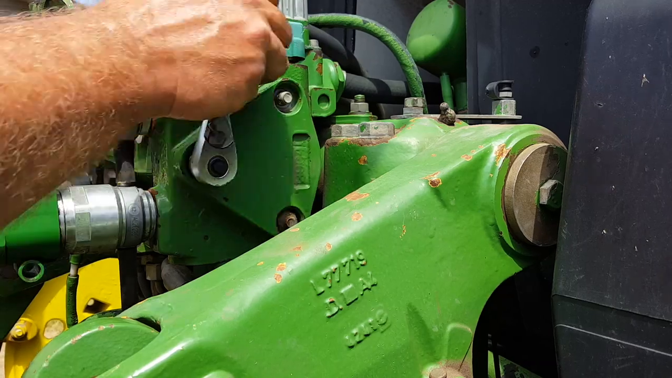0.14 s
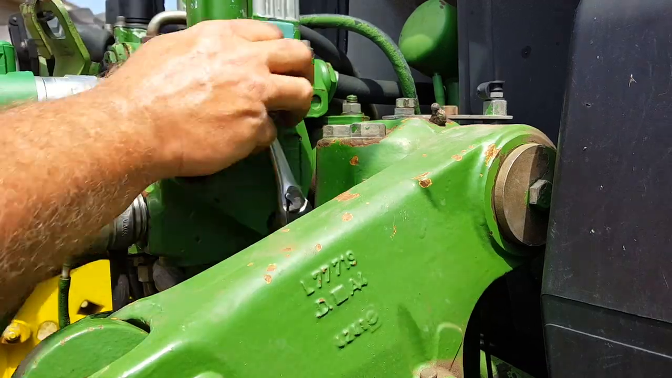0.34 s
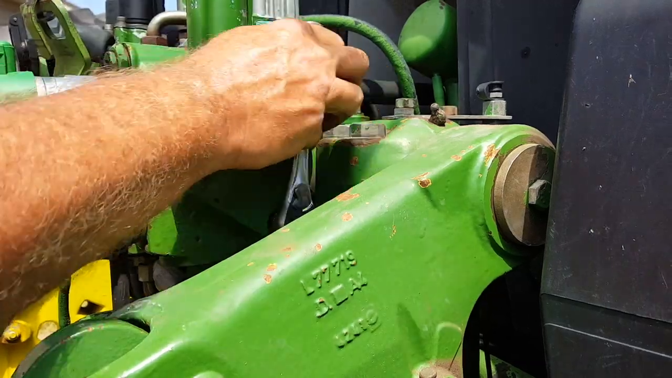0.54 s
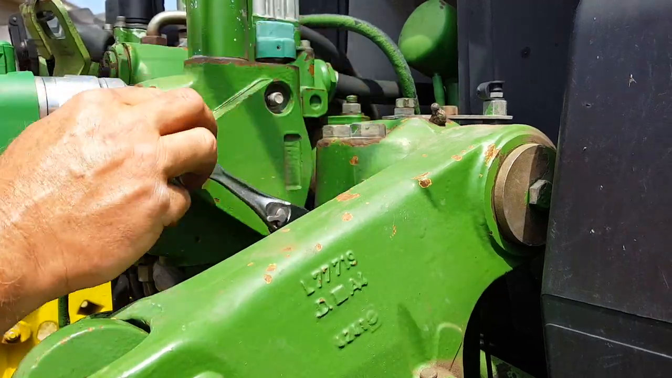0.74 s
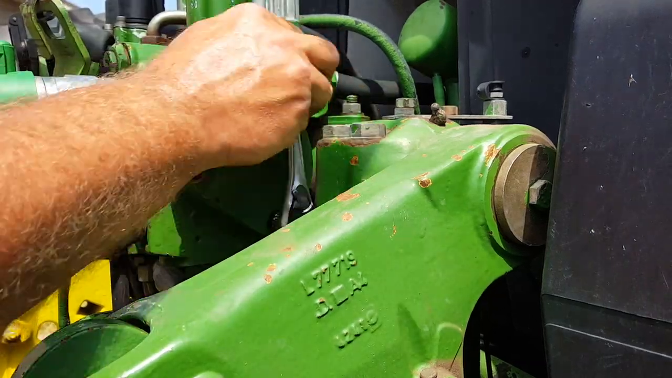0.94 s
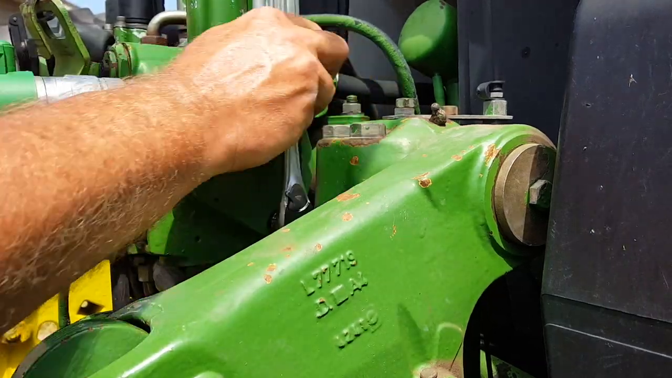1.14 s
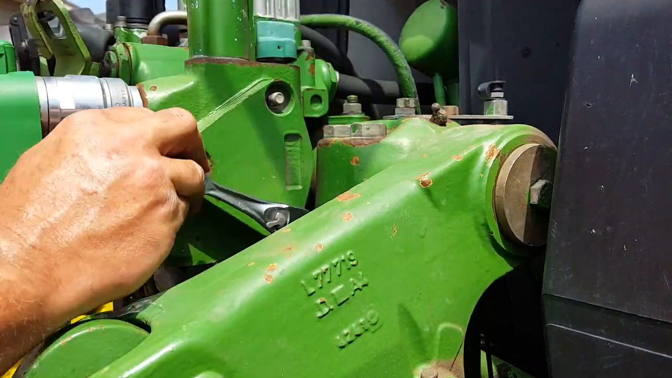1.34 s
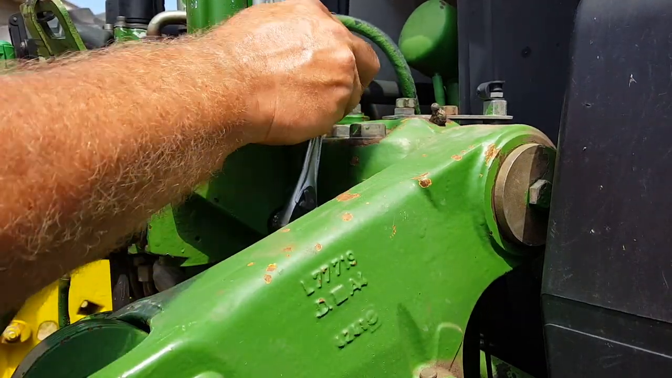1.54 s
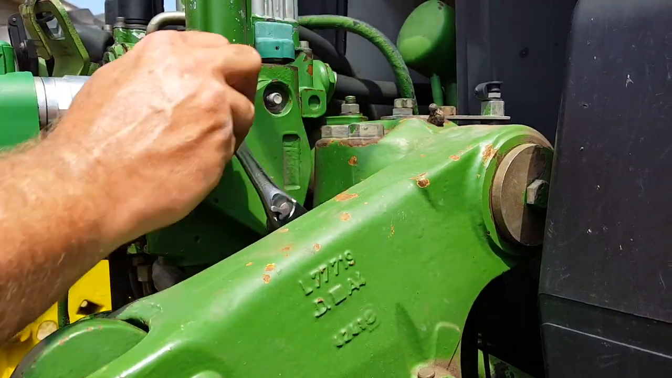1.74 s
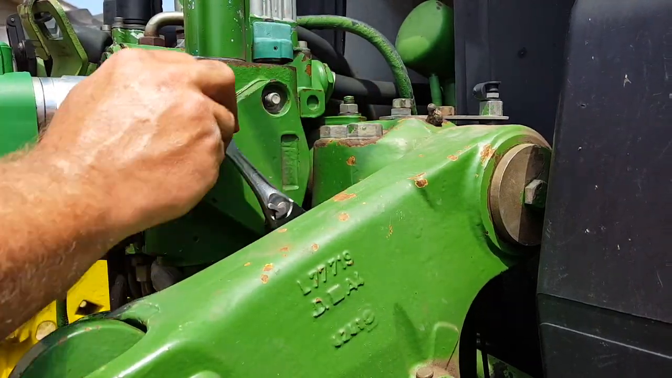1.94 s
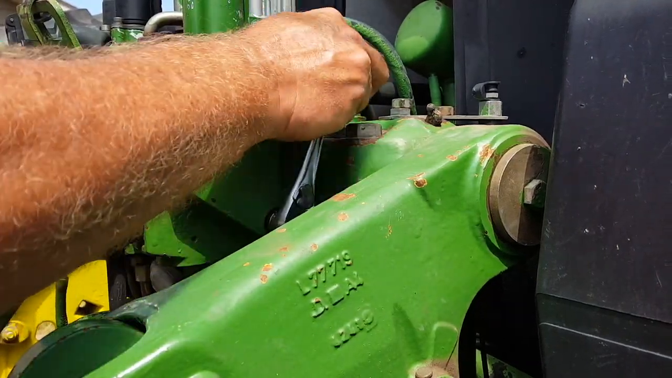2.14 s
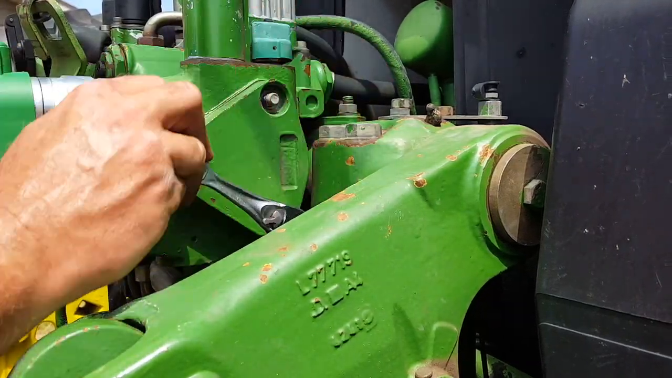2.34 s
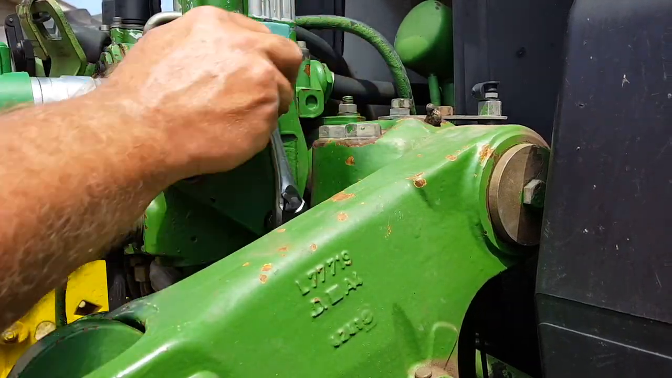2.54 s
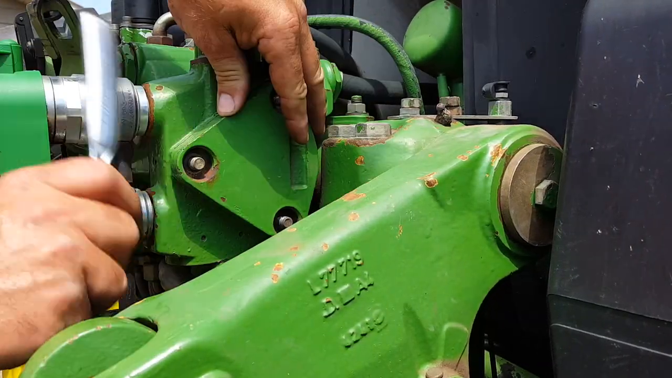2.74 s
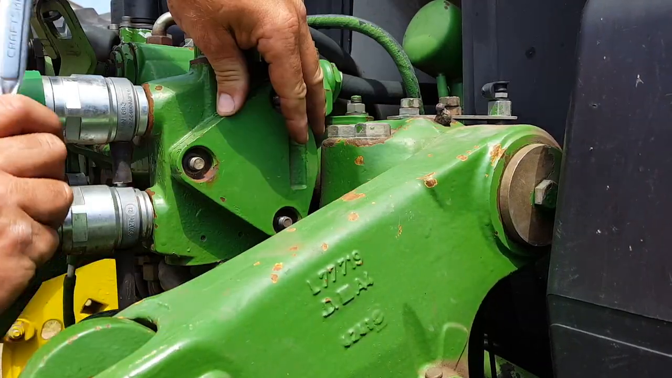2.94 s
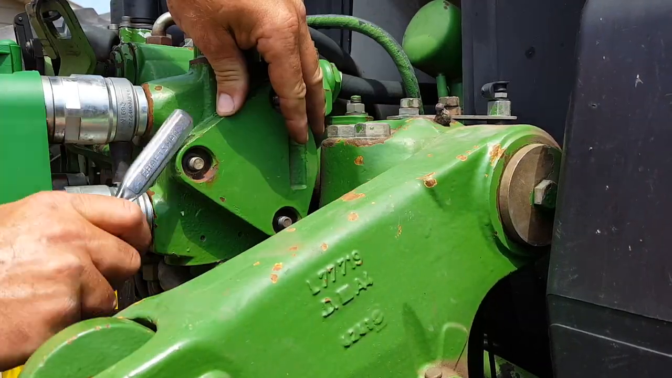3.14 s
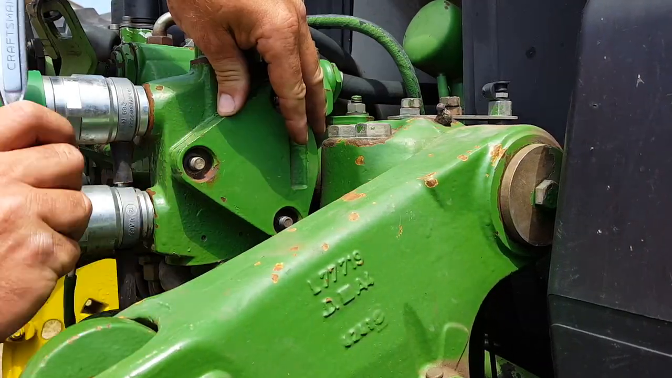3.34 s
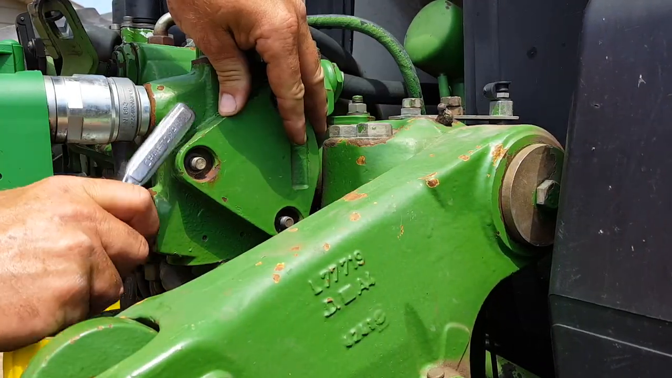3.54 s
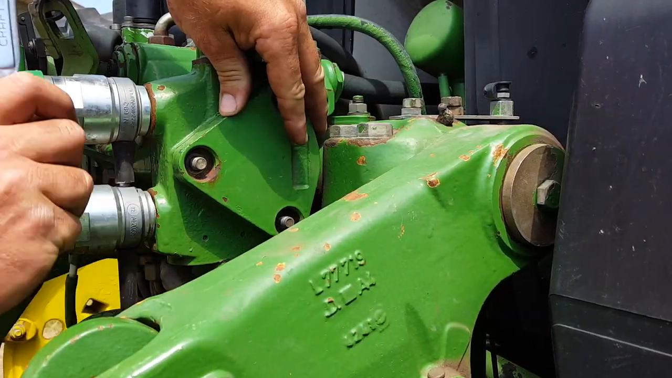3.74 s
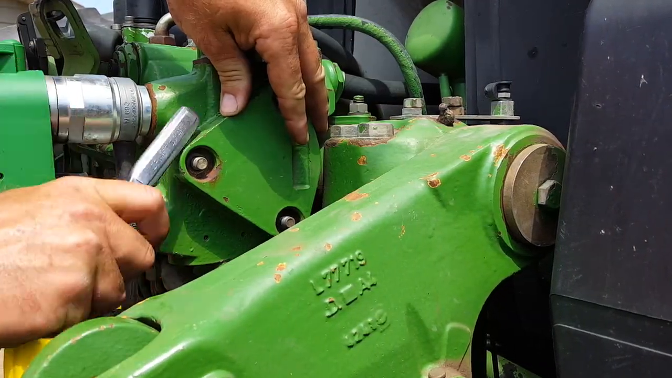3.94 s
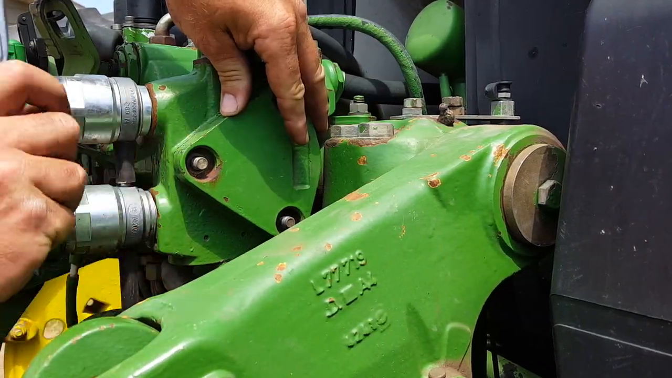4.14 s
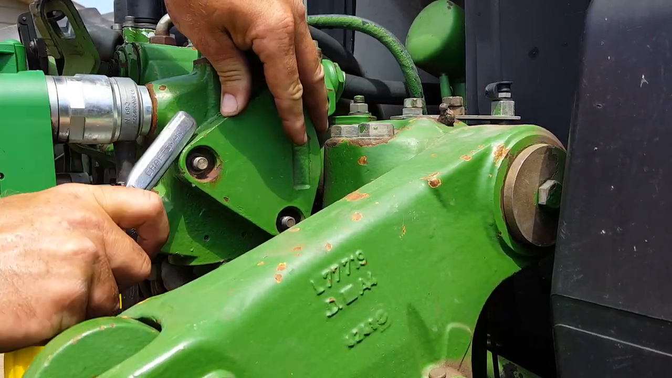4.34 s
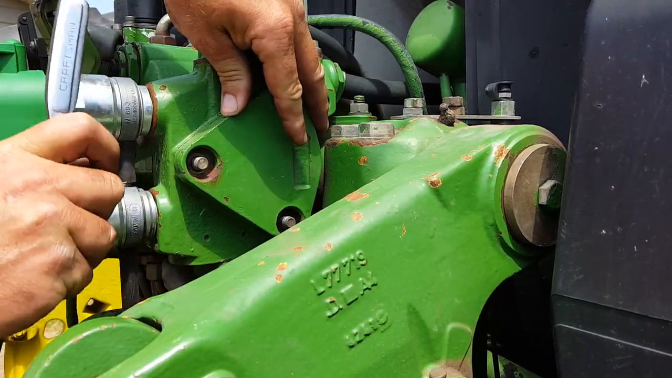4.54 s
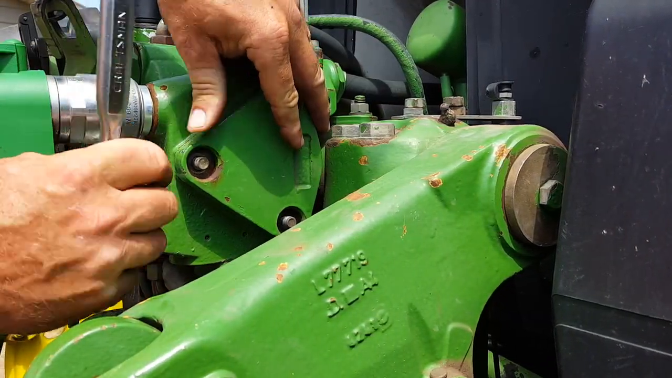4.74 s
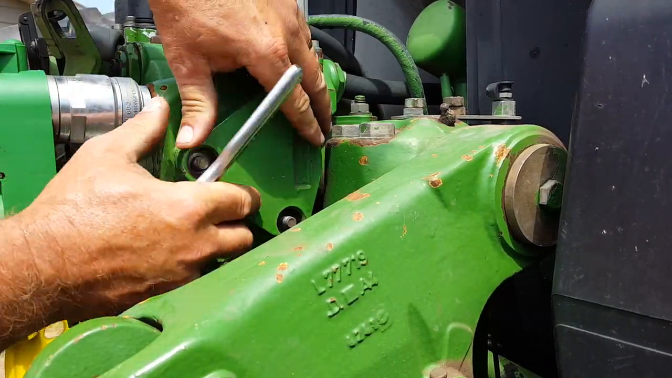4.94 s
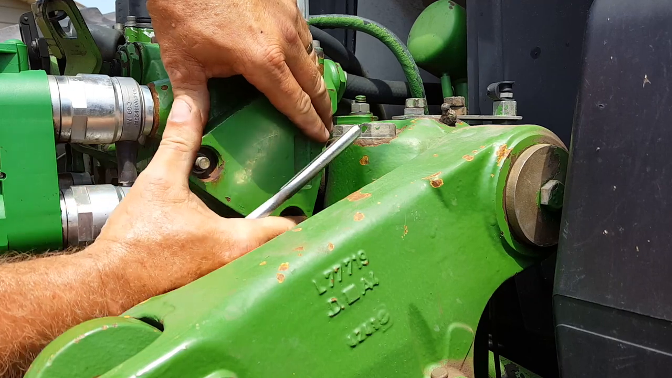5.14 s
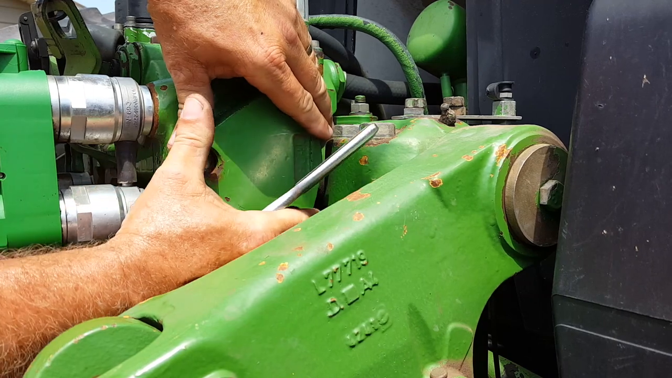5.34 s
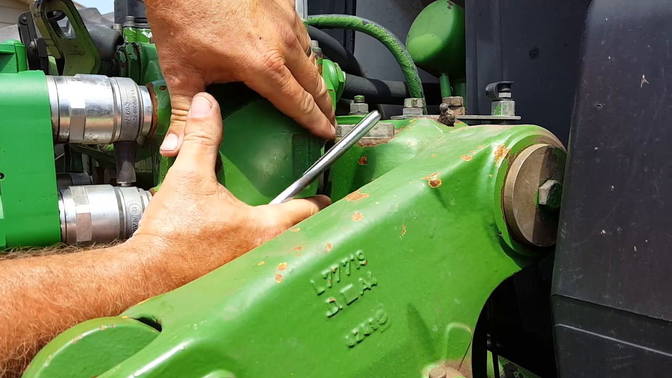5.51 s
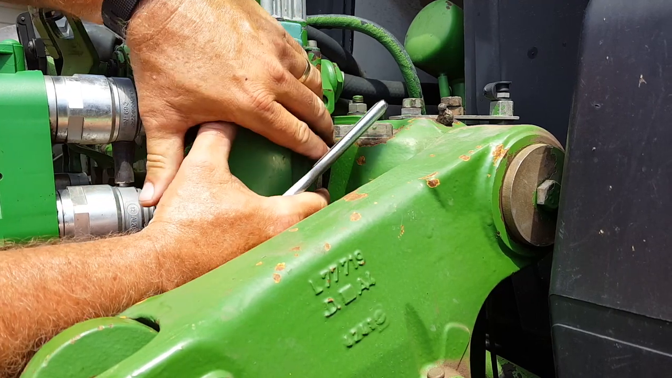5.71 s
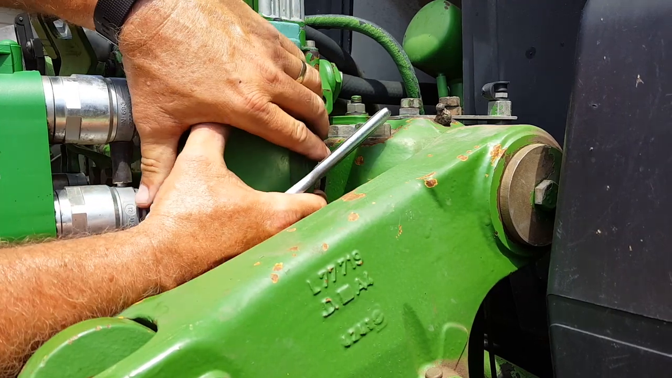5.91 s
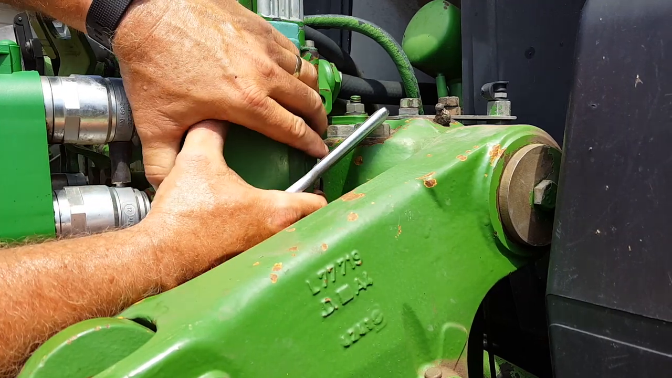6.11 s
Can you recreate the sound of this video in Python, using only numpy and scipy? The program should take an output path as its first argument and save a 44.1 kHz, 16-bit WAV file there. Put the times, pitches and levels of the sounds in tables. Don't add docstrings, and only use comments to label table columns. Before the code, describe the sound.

Crisp ratchet clicks and soft hand rubbing on a metal block, then five loud ringing wrench raps, ending in light handling knocks over faint outdoor hiss.

```python
import sys
import numpy as np
from scipy import signal
from scipy.io import wavfile

SR = 44100
rng = np.random.default_rng(int(sys.argv[2]) if len(sys.argv) > 2 else 0)


def elevation(decibels):
    levels = np.asarray(decibels, float)
    return 10 ** (levels / 20)


def store_wav(level_fs):
    pcm = np.round(np.clip(np.atleast_2d(level_fs), -1, 1) * 32767)
    wavfile.write(sys.argv[1], SR, pcm.T.astype(np.int16))


N = 276507
TIME_S = np.arange(N) / SR
SCENE_CHANGE_S = 2.79

# (start [s], end [s], drag at start [dB], drag at end [dB])
SWINGS = [
    (0.094, 0.302, -56, -87),
    (0.381, 0.523, -56, -60.5),
    (0.967, 1.094, -60.5, -66),
    (1.486, 1.68, -74, -79),
    (2.05, 2.26, -51, -76),
    (2.582, 2.751, -67, -72),
]
# (time [s], peak [dB], low colour [dB], high colour [dB], favoured mode [Hz])
RAPS = [(2.8389, -4.5, -11, -9, 8180), (2.8525, -23.5, -16.5, -7, 6500), (2.8589, -12.5, -13, -14.5, 1875),
        (3.1667, -6.5, -12.5, -6.5, 13100), (3.184, -13, -13.5, -9.5, 11250),
        (3.5473, -5.5, -13.5, -8.5, 6130), (3.5528, -18.5, -18, -8.5, 11250), (3.563, -11, -16, -10, 4070),
        (3.9608, -6.5, -16, -10, 6130), (3.9698, -14, -16.5, -9, 3770), (3.9778, -13.5, -16.5, -9, 11250),
        (4.3588, -4.5, -11, -7.5, 8180), (4.3737, -11.5, -23, -6, 13100), (4.3865, -26.5, -26, -11, 6130)]
# (before scene change [dB], added by a swing [dB], after scene change [dB], share of gain dip
TOP_LEVEL = (-82, 2, -76.0, 1)


def rms_one(x):
    return x / np.sqrt(np.mean(x ** 2) + 1e-20)


def in_time(rows):
    s, *columns = np.transpose(rows)
    return [np.interp(TIME_S, s, column) for column in columns]


def at_hz(points, hz):
    table_hz, value = np.transpose(points)
    return np.interp(np.log(hz), np.log(table_hz), value)


def add_at(out, s, piece):
    start = round(s * SR)
    out[..., start:start + piece.shape[-1]] += piece


def drift(rate):
    r = np.exp(-80 * np.pi * rate / SR)
    slow = signal.lfilter([1], [1, -2 * r, r * r], rng.standard_normal(N // 40 + 2002))[2000:]
    return np.interp(np.arange(N) / 40, np.arange(len(slow)), rms_one(slow))


def band_noise(low_hz, high_hz, order=2):
    sos = signal.butter(order, [low_hz, high_hz], "band", fs=SR, output="sos")
    return signal.sosfilt(sos, rng.standard_normal((2, N)))


def bands(spectrum, size=N):
    # (frequency [Hz], left-right likeness [-1 to 1])
    likeness = [(60, 1), (300, 0.64), (700, 0.14), (1500, -.1), (15000, -0.22)]
    white = rng.standard_normal((2, 2, size))
    edges = 20 * 2 ** np.arange(0, 10.1, .5)
    edges = edges[(edges > spectrum[0][0] / 1.3) & (edges < spectrum[-1][0] * 1.3)]
    for k, (low, high) in enumerate(zip(edges, edges[1:])):
        mid, side = signal.sosfilt(signal.butter(2, [low, high], "band", fs=SR, output="sos"), white[k % 2])
        hz = np.sqrt(low * high)
        alike = np.clip(at_hz(likeness, hz), -1, 1)
        stereo = np.sqrt(1 + alike) * mid + np.sqrt(1 - alike) * side * [[1], [-1]]
        yield hz, elevation(at_hz(spectrum, hz)) * stereo


def steady(spectrum, patchy_db):
    together = drift(14.0)
    return rms_one(sum(band * elevation(patchy_db * (0.37 * together + drift(5.9))) for hz, band in bands(spectrum)))


def arm():
    ramp_s = 0.13
    moves = [np.interp(TIME_S, [a - ramp_s, (a + b) / 2, b, b + ramp_s], [0, 0.8, 0.58, 0]) for a, b, *_ in SWINGS]
    return np.max(moves, axis=0)


def level(row):
    # (time [s], gain [dB])
    gain = [
        (2.79, -7),
        (3.5, -9.5),
        (4.63, -12),
        (4.98, -10.5),
        (5.04, -7),
        (5.36, 0),
        (6.27, 0),
    ]
    before_db, swing_db, after_db, share = row
    return np.where(TIME_S < SCENE_CHANGE_S, before_db + swing_db * arm(), after_db + share * in_time(gain)[0])


def rumble():
    # (frequency [Hz], density [dB per Hz])
    spectrum = [(12, -40), (20, -12.5), (27, -12), (43, -8.5), (91, 3), (145, -6), (216, -8), (258, -11),
                (300, -15), (462, -29.5), (700, -19.5), (910, -45), (1540, -120)]
    # (before scene change [dB], added by a swing [dB], after scene change [dB], share of gain dip [ratio])
    floor = (-60.5, 1, -62, 1.05)
    # (time [s], peak [dB], rise [dB per s])
    bumps = [(0.42, -53.5, 112), (0.65, -60, 150), (1.0, -57, 27), (1.201, -51.5, 301), (1.57, -53.5, 240),
             (1.745, -52, 99), (2.07, -56.5, 57), (2.33, -53, 19), (2.58, -55.5, 41), (2.68, -58.5, 52),
             (5.252, -59.5, 104), (5.456, -57.5, 37), (5.746, -58, 29.5), (6.02, -59.5, 24),
             (6.26, -54, 155)]
    bump_fall_db_per_s, boom_db, boom_fall_db_per_s = 120, -55.5, 66
    layers_db = [level(floor)]
    for s, peak_db, rise in bumps:
        layers_db.append(peak_db - np.maximum(rise * (s - TIME_S), bump_fall_db_per_s * (TIME_S - s)))
    for s, peak_db, *_ in RAPS:
        if peak_db > -9.5:
            layers_db.append(np.where(TIME_S > s, boom_db - boom_fall_db_per_s * (TIME_S - s), -130))
    return elevation(np.max(layers_db, axis=0) + 0.78) * steady(spectrum, patchy_db=1.27)


def leaf_hiss():
    # (frequency [Hz], density [dB per Hz])
    spectrum = [(180, -27.5), (300, 0), (443, -8.5), (520, -9), (1260, -12.5), (2950, -14.5), (5560, -21),
                (8460, -20), (9500, -21), (12400, -52), (20900, -120)]
    # (before scene change [dB], added by a swing [dB], after scene change [dB], share of gain dip [ratio])
    row = (-74.0, 7, -74, 0.9)
    return elevation(level(row) + 5.5) * steady(spectrum, patchy_db=0.55)


def top_hiss():
    edges = [12000, 15700]
    return elevation(level(TOP_LEVEL) + 1.5) * rms_one(band_noise(*edges))


def wind():
    # (time [s], level [dB])
    gust = [(0.0, -45.5), (0.02, -49), (0.062, -52), (0.106, -46), (0.154, -54.5), (0.18, -48.5),
            (0.27, -50), (0.29, -89), (0.36, -72)]
    gust_db, = in_time(gust + [(gust[-1][0] + .03, -120)])
    return elevation(gust_db + [[.5], [4.5]]) * rms_one(band_noise(35, 135, order=3))


def cricket():
    # (before scene change [dB], added by a swing [dB], after scene change [dB], share of gain dip [ratio])
    row = (-89, -8, -80, 1.1)
    hz, width_hz, throbs_per_s = 8620, 420, 17.0
    tone = band_noise(hz - width_hz / 2, hz + width_hz / 2)
    phase = 2 * np.pi * throbs_per_s * TIME_S - .5 + .4 * drift(1.5)
    throb = np.maximum(np.sin(phase) + .5, .3) * (1 - .4 * np.sin(3 * phase)) * elevation(2.5 * drift(3.0))
    return elevation(level(row)) * rms_one(tone * throb)


def rub():
    # (frequency [Hz], density [dB per Hz])
    colour = [(410, -45), (700, 1), (788, 1), (1170, -12.5), (3210, -12.5), (4170, -3), (4580, 3),
              (9800, -22), (12000, -17.5), (15600, -37.5), (22000, -120)]
    rub_db, swing_db, start_db_per_s, full_s = -73.5, 7, 54, 0.41
    working_db = rub_db + swing_db * arm() - start_db_per_s * np.maximum(full_s - TIME_S, 0)
    return elevation(np.where(TIME_S < SCENE_CHANGE_S, working_db, -130) + 4.5) * steady(colour, patchy_db=1.0)


def ring(clicks, hz, t60):
    r, w = elevation(-60 / (t60 * SR)), 2 * np.pi * hz / SR
    return signal.lfilter([0, np.sin(w)], [1, -2 * r * np.cos(w), r * r], clicks + 1e-18)


def dying(clicks, t60):
    return signal.lfilter([1], [1, -elevation(-60 / (t60 * SR))], clicks + 1e-18)


def strike(events, pan_db, bass_left_db, favour_db, modes, crack, crack_t60, modes_db, crack_db, scatter_db,
           ring_s, chatter_db, tail_t60, tail_db, tail):
    rattle_db, rattle_per_s = 3.0, 220
    s, peak_db, low_db, high_db, favoured_hz = np.transpose(events)
    first = round(s.min() * SR)
    at = np.round(s * SR).astype(int) - first
    size = at.max() + SR // 3
    favoured = np.argmin(abs(favoured_hz[:, None] - np.array(modes)[:, 0]), axis=1)

    def train(hz, gain):
        low = np.clip(np.log2(3500 / hz), 0, 1)
        high = np.clip(2 * np.log2(hz / 7500), 0, 1)
        side = elevation(np.outer([.5, -.5], pan_db + bass_left_db * low + np.zeros(len(s))))
        clicks = np.zeros((2, size))
        clicks[:, at] = side * elevation(peak_db + low * low_db + high * high_db) * gain
        return clicks

    out, grit = np.zeros((2, size)), rng.standard_normal((2, size))
    for k, (hz, level_db, t60) in enumerate(modes):
        luck = np.clip(rng.standard_normal((len(at), 4)).T, -2, 1.5)
        mode_db = level_db + modes_db + favour_db * (favoured == k) + scatter_db * luck[:2]
        clicks = train(hz, elevation(mode_db) * np.sign(luck[2:]))
        chatter = elevation(chatter_db) * grit * dying(clicks, min(t60, tail_t60))
        out += ring(clicks + chatter, hz, np.clip(ring_s, .008, .04))
    for hz, band in bands(crack, size=size):
        clicks = train(hz, elevation(crack_db))
        rattle = elevation(tail_db + at_hz(tail, hz) + rattle_db * drift(rattle_per_s)[:size])
        out += band * (dying(clicks, at_hz(crack_t60, hz)) + rattle * dying(clicks, tail_t60 * (hz / 3000) ** -.2))
    return np.pad(out, [(0, 0), (first, N - first - size)])


def ratchet():
    # (time [s], peak [dB], low colour [dB], high colour [dB], favoured mode [Hz])
    pawl = [(0.1231, -32.5, -13, -1, 12750), (0.1404, -28, -22, -1, 8170), (0.1545, -32, -39, -1.5, 11290),
            (0.187, -29.5, -44, -3, 11290), (0.2613, -26.5, -13.5, 1, 1818), (0.299, -34, -15, -2.5, 4095),
            (0.398, -22.5, -22.5, -6, 4095), (0.4222, -26, -30, -10, 12750), (0.4454, -30, -21, -4, 12750),
            (0.4646, -32.5, -18, -3, 12750), (0.4835, -24, -19, 1.5, 6120), (0.5118, -23, -23, -1, 6120),
            (0.9645, -33, -38, -1, 8170), (0.9868, -33, -28, -7, 12750), (1.0116, -28.5, -23, -1, 11290),
            (1.0329, -27, -12, -0.5, 3110), (1.059, -27, -17, -2, 6120), (1.092, -25, -18.5, -0.5, 4095),
            (1.5228, -34.5, -17, -9, 12750), (1.5612, -33.5, -16, -2, 11290),
            (1.5845, -29.5, -14.5, -4, 3110), (1.6134, -28, -19, -1, 11290),
            (1.6604, -24, -22.5, -0.5, 3110), (2.0783, -30.5, -16, -7, 11290),
            (2.0967, -25.5, -19, -3.5, 11290), (2.1171, -24, -19, -9, 4870),
            (2.141, -28.5, -15.5, -6.5, 11290), (2.6424, -24.5, -24, 2.5, 10660),
            (2.6542, -27, -15, 0, 6120), (2.678, -26, -16, -7.5, 3110), (1.0155, -31, -19, -2.5, 11290),
            (2.2658, -44.5, -17, -6, 6120)]
    # (time [s], peak [dB])
    slips = [(0.0494, -34), (0.104, -34), (0.2674, -28.5), (0.3713, -28), (0.4286, -32), (1.024, -32),
             (1.1773, -41), (1.504, -35.5), (1.5422, -37.5), (1.738, -38), (2.0401, -36.5), (2.0583, -34),
             (2.177, -33.5), (2.2413, -45), (2.5815, -41), (2.601, -33), (2.616, -42), (2.635, -33),
             (2.711, -36)]
    # (time [s], peak [dB], low colour [dB], favoured mode [Hz])
    seats = [(0.1998, -37.5, -12, 4870), (0.253, -48, -13, 1818), (0.5977, -41, -16, 4095),
             (0.636, -40.5, -37, 4095), (0.881, -43, -17, 4095), (0.903, -43.5, -7.5, 4095),
             (1.1883, -39, -11, 6120), (1.2054, -34, -13, 4095), (1.414, -32, -25, 8170),
             (1.703, -40, -14, 6120), (1.9506, -33.5, -19, 8170), (1.9786, -45.5, -4.5, 4095),
             (2.1685, -37, -11, 6120), (2.1831, -33.5, -14, 1818), (2.1942, -36, -11, 950),
             (2.2126, -37, -8, 4095), (2.2569, -38.5, -22, 4870), (2.292, -46.5, -33, 4870),
             (2.352, -49, -26, 4095), (2.4998, -26.5, -26.5, 8170), (2.5203, -45, -8, 1818),
             (2.7246, -41.5, -18, 1818), (2.785, -45, -13, 6120)]
    # (frequency [Hz], level [dB], decay t60 [s])
    wrench = [(950, 8.5, .05), (1818, 11.5, .05), (3110, 0, 0.03), (4095, -1.5, .07), (4870, -10, .05),
              (6120, -0.5, .08), (8170, -5.5, .06), (8180, 0.5, 0.015), (10660, 9, 0.0052),
              (11290, 6, 0.036), (12750, 6, .015), (16100, -1, 0.013)]
    # (frequency [Hz], density [dB per Hz])
    crack = [(290, 2.5), (500, -3), (950, 7.5), (1440, -14), (1900, 13.5), (2500, -13.5), (4030, -11),
             (7310, -10.5), (11100, -4), (16000, -3.5)]
    # (frequency [Hz], decay t60 [s])
    crack_t60 = [(500, 0.014), (3000, 0.061), (15000, 0.005)]
    # (frequency [Hz], level [dB])
    tail = [(300, -2), (2000, -1), (15000, -4)]
    contacts = pawl + [(s, db, -19.5, -2.5, 12750) for s, db in slips]
    contacts = contacts + [(s, db, low_db, -8, hz) for s, db, low_db, hz in seats]
    pan_db = 0.9 + 2.5 * rng.standard_normal(len(contacts))
    return strike(contacts, pan_db, 0.41, 7.6, wrench, crack, crack_t60, modes_db=-22.0, crack_db=-0.5,
                  scatter_db=1.5, ring_s=0.014, chatter_db=-15.0, tail_t60=0.058, tail_db=-32.0, tail=tail)


def rings():
    # (time [s], peak [dB], frequency [Hz], decay t60 [s])
    contact_rings = [(0.103, -56, 1460, 0.057), (0.2, -58, 1320, 0.035), (0.263, -47, 2204, .04),
                     (0.292, -56, 4180, .06), (0.373, -58, 2920, .05), (0.399, -52, 1210, 0.058),
                     (0.484, -42, 1885, 0.07), (0.49, -62, 1003, .04), (0.513, -41, 1860, 0.039),
                     (0.987, -44, 13000, .03), (1.033, -49.5, 890, .04), (1.059, -48, 1852, 0.031),
                     (1.06, -48, 4040, 0.07), (1.092, -42.5, 3050, 0.036), (1.206, -49.5, 3090, .04),
                     (1.157, -62, 4100, .07), (1.523, -48, 13000, 0.032), (1.543, -50, 11100, .03),
                     (1.585, -38, 11300, 0.058), (1.585, -56, 1010, .04), (1.614, -58, 1000, .05),
                     (1.614, -50, 1875, 0.08), (1.661, -46.5, 1760, 0.032), (2.042, -58, 747, 0.039),
                     (2.097, -56, 950, .04), (2.118, -49.5, 1900, 0.069), (2.118, -42, 4650, .04),
                     (2.118, -61, 806, 0.035), (2.141, -55.5, 1610, .03), (2.184, -54, 1764, .06),
                     (2.5, -55, 800, 0.029), (2.521, -60, 2101, .04), (2.642, -55.5, 1914, 0.13),
                     (2.654, -47.5, 853, .04), (2.654, -50.5, 1920, 0.06), (2.679, -48.5, 1003, 0.056),
                     (2.712, -60, 1050, 0.036), (2.728, -61, 1800, 0.032), (0.051, -44, 9650, .02),
                     (0.262, -49, 11200, 0.046), (1.727, -50, 700, .03), (5.7413, -43, 830, .012),
                     (5.007, -66, 8100, .04), (5.224, -64, 8030, .04)]
    # (time [s], peak [dB], frequency [Hz], decay t60 [s])
    rap_rings = [(2.8395, -21.5, 2550, .025), (2.8392, -19, 6240, 0.022), (2.8395, -21, 8280, .04),
                 (2.839, -25, 700, .018), (2.86, -30, 1875, .065), (2.878, -44.5, 6130, 0.098),
                 (3.167, -19, 6300, .022), (3.184, -35, 1875, .07), (3.185, -23, 11250, 0.039),
                 (3.5475, -22, 1010, .018), (3.563, -28, 4070, .05), (3.9616, -21.5, 1500, 0.019),
                 (3.9609, -18, 6470, .022), (3.965, -25.5, 3910, .05), (4.359, -19, 740, .018),
                 (4.359, -19, 1502, 0.017), (4.359, -21, 1940, 0.022), (4.3592, -21, 6130, .1),
                 (4.385, -38, 8180, .07)]
    twin_split, twin_db, lag_ms, flutter_db, flutter_per_s = 0.045, -5.5, 0.098, 3.0, 60.
    rows = contact_rings + rap_rings
    out, t = np.zeros((2, N)), np.arange(6000) / SR
    for (s, peak_db, hz, t60), (split, lag) in zip(rows, rng.uniform(-1, 1, (len(rows), 2))):
        late = t - np.array([[0], [lag * lag_ms / 1000]])
        twin = elevation(twin_db) * np.sin(2 * np.pi * hz * (1 + twin_split * split) * late)
        add_at(out, s, elevation(peak_db - 60 * t / t60) * (np.sin(2 * np.pi * hz * late) + twin))
    return out * elevation(flutter_db * drift(flutter_per_s))


def drag():
    grains = rng.standard_normal((2, N)) * (rng.random(N) < 2500. / SR)
    grains = grains * elevation(3.5 * np.minimum(rng.exponential(1, N), 3))
    bright = signal.sosfilt(signal.butter(2, [1500., 14000.], "band", fs=SR, output="sos"), grains)
    rows = []
    for a, b, a_db, b_db in SWINGS:
        rows += [(a - .004, -130), (a, a_db), (b, b_db), (b + .01, -130)]
    return elevation(in_time(rows)[0]) * rms_one(bright)


def thuds():
    # (time [s], left push [full scale], right push [full scale], length [ms])
    jolts = [(0.0977, .006, .016, 5.8), (0.111, 0.0029, 0.038, 9.6), (0.2157, 0.0017, 0.055, 6.4),
             (0.2732, 0.0085, 0.042, 7.4), (1.7477, .014, 0.019, 5.8), (2.8387, 0.25, -0.038, 4.2),
             (3.1661, -0.39, -0.062, 2.15), (3.168, 0.079, 0.12, 1.4), (3.547, 0.41, -0.044, 1.36),
             (3.9611, -0.78, -0.044, 1.53), (3.9613, 0.17, -0.016, 5), (4.359, 0.1, -0.062, 1.8),
             (4.3618, 0.11, 0.26, 3.0), (4.364, 0.26, -0.13, 1.9), (4.374, -0.13, 0.0085, 3.2)]
    push = np.zeros((2, N))
    for s, left, right, length_ms in jolts:
        add_at(push, s, np.outer([left, right], np.hanning(round(length_ms * SR / 1000))))
    return signal.sosfilt(signal.butter(2, 55., "high", fs=SR, output="sos"), push)


def whistles():
    # (start [s], length [s], frequency [Hz], level [dB])
    calls = [
        (2.92, .2, 885, -84),
        (3.26, .22, 885, -82),
        (3.6, .17, 825, -82),
        (3.31, .05, 3550, -83),
        (3.465, .05, 3650, -84),
        (3.755, .03, 2750, -89),
        (4.45, .16, 1270, -88),
        (.75, .12, 4680, -76),
        (1.27, .1, 4700, -80),
    ]
    out = np.zeros(N)
    for s, length, hz, db in calls:
        t = np.arange(round(length * SR)) / SR
        waver = 0.0059 * hz / 12.0 * np.sin(2 * np.pi * 8.3 * t)
        add_at(out, s, elevation(db + 1.5) * np.sin(np.pi * t / length) * np.sin(2 * np.pi * hz * t + waver))
    return out * elevation(3.8 * drift(40.0))


def knocks():
    # (time [s], peak [dB], body [Hz], bright edge [dB], decay t60 [s])
    hits = [(2.845, -28, 280, -69.5, .22), (3.172, -26.5, 280, -70, .22), (3.553, -30, 300, -69, 0.2),
            (3.967, -28.5, 280, -70, 0.24), (4.366, -30, 280, -70.5, .22), (5.735, -43, 1300, -32, 0.038),
            (4.799, -62.5, 4110, -4, 0.035), (4.875, -65, 2350, -26, 0.062),
            (5.006, -54.5, 3940, -12, 0.054), (5.223, -50.5, 4300, -20.5, 0.045), (6, -57, 2800, -31, .07),
            (5.742, -35, 700, -24, 0.034), (5.745, -45.5, 3940, -24, 0.034), (5.749, -50, 1600, -12, 0.13),
            (5.942, -55.5, 2800, -7, 0.046), (6.076, -41, 3370, -0.5, 0.015),
            (6.077, -44, 1330, -28, 0.045), (6.076, -44.5, 3800, -31, 0.026), (6.1, -54, 1150, -30, .04),
            (5.028, -56, 940, -30, 0.039), (5.008, -63.5, 2200, -30, 0.043),
            (3.145, -58, 1200, -24.5, 0.045), (2.802, -60, 2500, -20, .03), (1.193, -37, 689, -40, 0.09),
            (1.415, -43, 940, -40, 0.033), (1.95, -44, 770, -40, 0.047), (2.06, -42.5, 680, -40, 0.11),
            (2.6, -40, 630, -40, 0.089), (1.24, -44, 400, -40, 0.25), (1.9, -36, 220, -40, .12),
            (2, -40, 330, -40, 0.11), (5.224, -56, 1140, -30, .04), (5.224, -57, 2400, -30, .04),
            (5.943, -55, 1500, -30, 0.043), (6.077, -45, 780, -28, .03), (6.04, -62, 3200, -32, .08),
            (5.71, -54.5, 1900, -9, .12), (5.77, -58, 2000, -13, 0.13)]
    out, t = np.zeros((2, N)), np.arange(4000) / SR
    for s, peak_db, hz, edge_db, t60 in hits:
        puff = rng.standard_normal((2, len(t))) * elevation(peak_db - 60 * t / t60)
        body = signal.lfilter(*signal.iirpeak(hz, 4.5, fs=SR), puff)
        edge = signal.sosfilt(signal.butter(2, 4500., "high", fs=SR, output="sos"), puff)
        add_at(out, s, elevation(7.5) * body + elevation(edge_db + 4.5) * edge)
    return out


def katydid():
    hz, width_hz, throbs_per_s, over_top_hiss_db = 14200., 700., 29., -5.0
    tone = band_noise(hz - width_hz / 2, hz + width_hz / 2)
    throb = np.maximum(np.sin(2 * np.pi * throbs_per_s * TIME_S + 1.5 * drift(3.0)), .1)
    return elevation(level(TOP_LEVEL) + over_top_hiss_db) * rms_one(tone * throb) * (TIME_S > SCENE_CHANGE_S)


def raps():
    # (frequency [Hz], level [dB], decay t60 [s])
    coupler = [(1875, 1.5, 0.12), (2456, -6, 0.04), (2650, -7, 0.06), (3220, -8.5, 0.021),
               (3770, -6.5, .05), (4070, -5.5, 0.076), (4935, -11, 0.03), (6130, -3.5, 0.055),
               (6500, -4.5, 0.04), (8180, 1, 0.057), (8590, -5, 0.049), (11250, 5, 0.069), (13100, 3, .05),
               (14900, -4, .05)]
    # (frequency [Hz], density [dB per Hz])
    crack = [(180, -37.5), (300, -5.5), (1080, 0.5), (1900, 3.5), (3190, -7.5), (4160, -10.5), (7320, -10),
             (8360, -8.5), (9880, -8.5), (13300, 1.5), (16000, -16)]
    # (frequency [Hz], decay t60 [s])
    crack_t60 = [(300, .025), (1500, 0.019), (6000, 0.015), (15000, 0.014)]
    # (frequency [Hz], level [dB])
    tail = [(200, 0), (450, -8), (1000, -7.5), (1600, -4.5), (2200, -1), (6000, 0.5), (10000, -3.5),
            (15000, -5)]
    null_hz, null_q, top_hz = 9420, 33, 16000
    hits = strike(RAPS, 1, 4.5, 6.1, coupler, crack, crack_t60, modes_db=-15.0, crack_db=5.0, scatter_db=3.0,
                  ring_s=0.022, chatter_db=-18.0, tail_t60=0.09, tail_db=-12.5, tail=tail)
    shaded = signal.sosfilt(signal.butter(6, top_hz, fs=SR, output="sos"), hits)
    return signal.lfilter(*signal.iirnotch(null_hz, null_q, fs=SR), shaded)


def squeaks():
    # (start [s], length [s], start pitch [Hz], end pitch [Hz], level [dB])
    glides = [
        (4.197, .14, 7400, 7030, -90.5),
        (4.424, 0.11, 6200, 6000, -83),
        (4.96, .08, 7160, 7010, -84),
        (5.03, 0.19, 6830, 7100, -86),
        (5.66, .1, 7020, 7200, -86),
        (5.779, 0.13, 7050, 7440, -85),
    ]
    width_hz = 280
    out = np.zeros((2, N))
    for s, length, start_hz, end_hz, db in glides:
        t = np.arange(round(length * SR)) / SR
        rough = signal.sosfilt(signal.butter(2, width_hz, fs=SR, output="sos"), rng.standard_normal((2, len(t))))
        phase = 2 * np.pi * (start_hz * t + (end_hz - start_hz) * t ** 2 / (2 * length))
        add_at(out, s, elevation(db) * rms_one(rough) * np.sin(np.pi * t / length) * np.sin(phase) * 2)
    return out


def scene():
    air = rumble() + leaf_hiss() + top_hiss() + wind() + cricket() + katydid()
    quiet = air + rub() + ratchet() + drag()
    quiet = signal.sosfilt(signal.cheby2(10, 40, 16000, fs=SR, output="sos"), quiet)
    return quiet + rings() + thuds() + whistles() + knocks() + raps() + squeaks()


def top_cut(x):
    return signal.sosfilt(signal.butter(12, 17060, fs=SR, output="sos"), x)


def record(dry):
    soft = .86 * np.tanh(dry / .86)
    cut = signal.sosfilt(signal.cheby2(12, 70, 17000, fs=SR, output="sos"), soft)
    return top_cut(cut)


dry = scene()
out = record(dry)
store_wav(out)
```